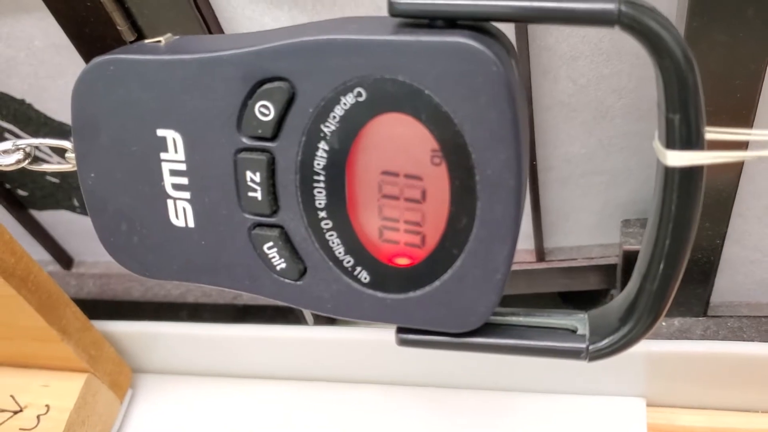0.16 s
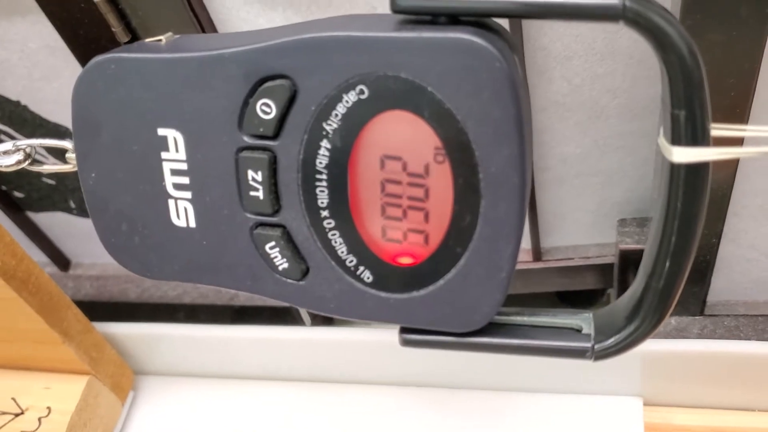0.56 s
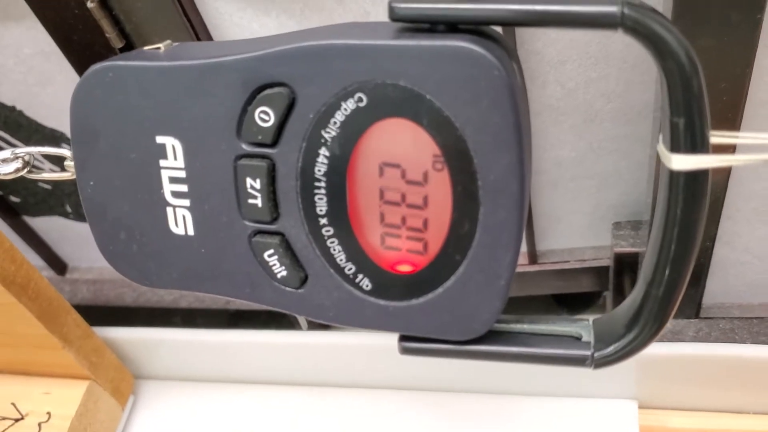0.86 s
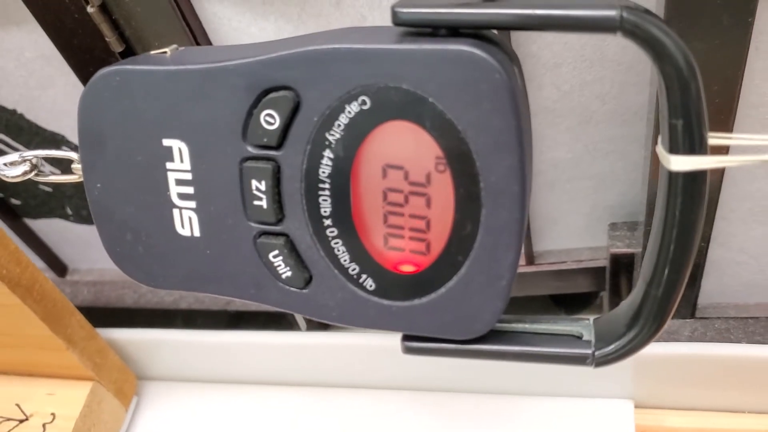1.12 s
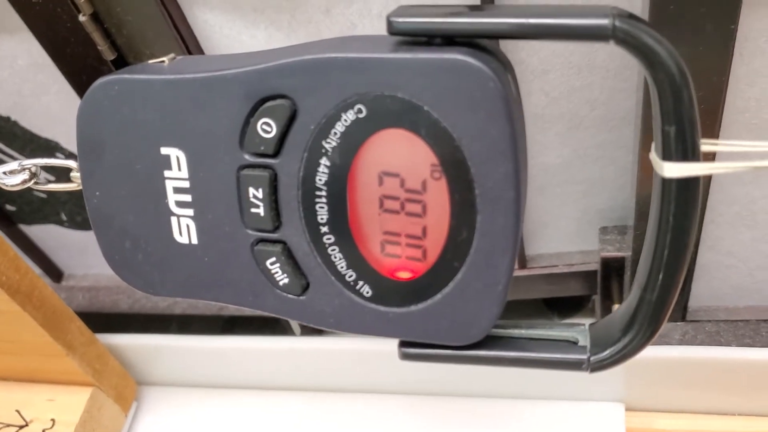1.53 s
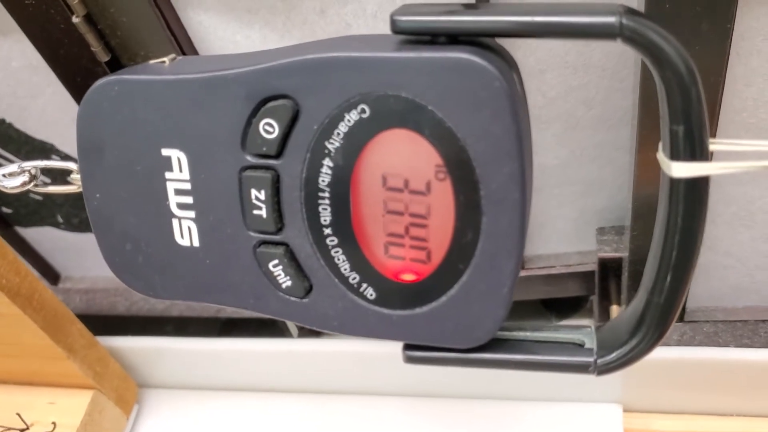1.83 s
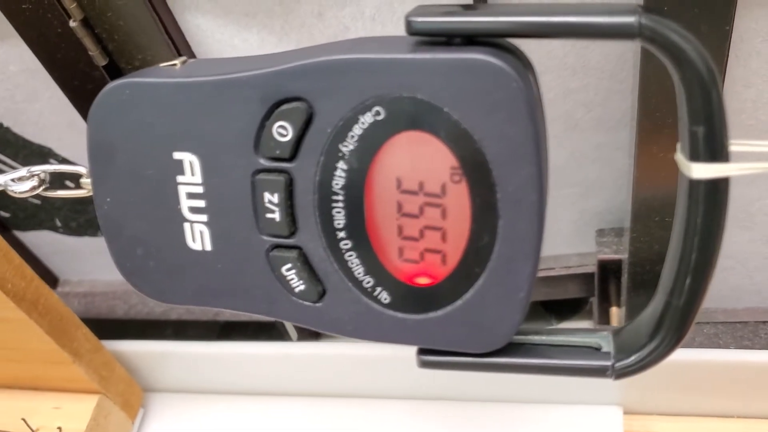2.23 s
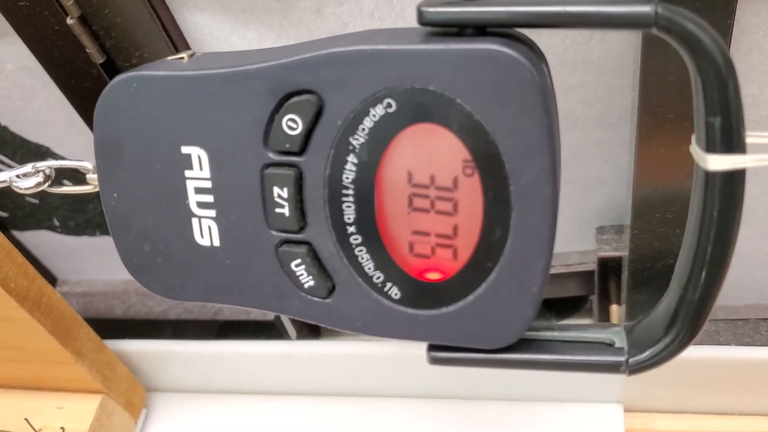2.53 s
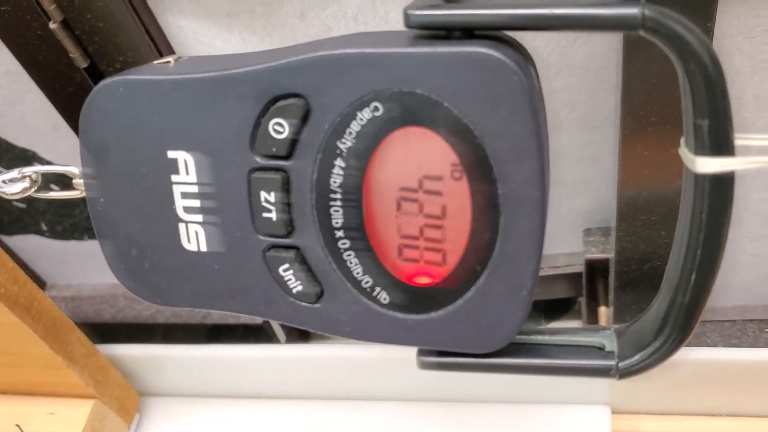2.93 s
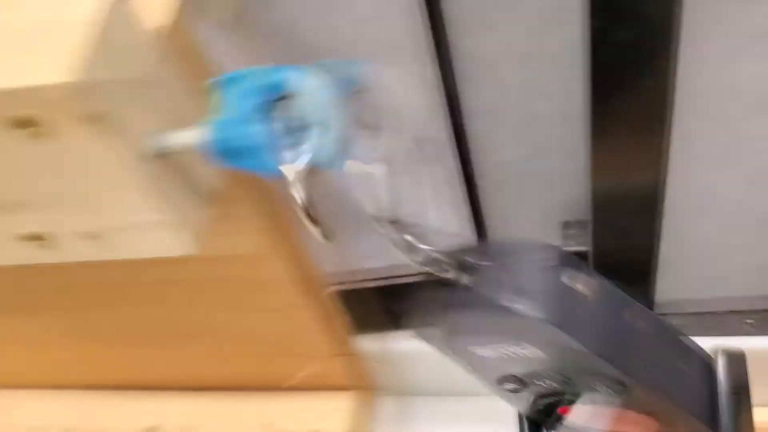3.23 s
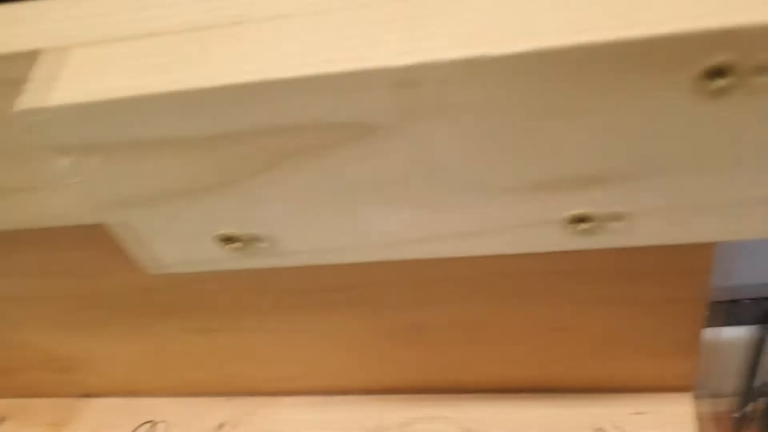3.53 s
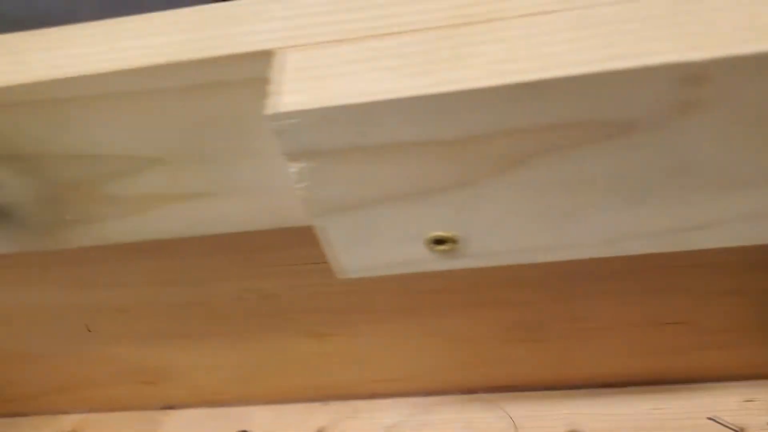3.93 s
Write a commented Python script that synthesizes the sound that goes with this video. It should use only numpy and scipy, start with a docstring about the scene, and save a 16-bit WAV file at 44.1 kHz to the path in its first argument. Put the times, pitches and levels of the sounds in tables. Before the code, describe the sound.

A low steady indoor hum, a faint tick or two, then a piercing snap, hissing whip and a clattering burst of wooden knocks.

```python
"""In a small workshop a braided line, loaded through a hanging scale, slips, ticks and snaps.
Splintery grit makes the cracks and fluttering noise the hiss of the line whipping through its guides.
Scale, chain and rig bang on a wooden bench of parallel resonances, then rattle to rest.
Wavering sines hum as a machine in the building and coloured noise rumbles as air;
this background sinks once the loud blows begin. A diffuse tail of decaying noise makes the room."""
import sys
import numpy as np
from scipy import signal
from scipy.fft import rfft, irfft
from scipy.io import wavfile

SR = 44100
rng = np.random.default_rng(int(sys.argv[2]) if len(sys.argv) > 2 else 0)


def to_wav(s):
    """Save 16-bit WAV."""
    ch = np.atleast_2d(s).T  # columns
    pcm = np.round(np.clip(ch, -1, 1) * 32767)  # PCM
    wavfile.write(sys.argv[1], SR, pcm.astype(np.int16))


def field_ratio(decibels):
    """Amplitude ratio for a level in dB (20 dB per decade); scalars and array-likes work."""
    return 10 ** (np.asarray(decibels, dtype=float) / 20)


N = 179433   # length in samples


def rms_one(x):
    """Power normalisation: scale to unit rms."""
    return x / np.sqrt(np.mean(x ** 2) + 1e-20)


def by_peak(x):
    """Peak normalisation: bring each channel to peak 1."""
    return x / np.abs(x).max(axis=1, keepdims=True)


def at_hz(points, hz):
    """Logarithmic frequency scale: interpolate a table between its points."""
    table_hz, values = np.array(points).T
    return np.interp(np.log(hz + 1), np.log(table_hz), values)


def coloured(x, spectrum):
    """Linear filtering: impose a spectrum; white noise of rms 1 keeps rms 1."""
    gain = field_ratio(at_hz(spectrum, np.fft.rfftfreq(N, 1 / SR)))
    return irfft(rfft(x) * rms_one(gain), N)


def stereo_noise(likeness):
    """Interchannel coherence: mid and side noise weighted for the likeness at each frequency."""
    mid, side = rfft(rng.standard_normal((2, N)))
    alike = np.clip(at_hz(likeness, np.fft.rfftfreq(N, 1 / SR)), -1, 1)
    common = np.sqrt(.5 + alike / 2) * mid
    opposed = np.sqrt(.5 - alike / 2) * side * [[1], [-1]]
    return irfft(common + opposed, N)


def drift(rate):
    """Random modulation: noise through a two-pole low-pass at rate/Hz, spread 1."""
    r = np.exp(-2 * np.pi * rate / SR)
    noise = rng.standard_normal(N + SR)
    return rms_one(signal.lfilter([1], [1, -2 * r, r * r], noise)[SR:])   # drop the settling second


def resonance(x, hz, width_hz):
    """Damped resonance: a two-pole band-pass with gain 1 at its top."""
    r = np.exp(-np.pi * width_hz / SR)
    zeros = np.array([1, 0, -1]) * (1 - r * r) / 2
    poles = [1, -2 * r * np.cos(2 * np.pi * hz / SR), r * r]
    return signal.lfilter(zeros, poles, x)


def swell(ms, size, sharp):
    """Impact envelope: peak 1 after ms; a sharper one also stops sooner."""
    t = np.arange(size) / SR / (ms / 1000)
    return (t * np.exp(1 - t)) ** sharp


def grit(size, spread_db, shared):
    """Impulsive noise: dense uneven micro-clicks, partly shared by both channels."""
    unevenness = field_ratio(spread_db * rng.standard_normal((3, size)))
    clicks = rng.standard_normal((3, size)) * unevenness
    return rms_one(clicks[:2] + shared * clicks[2])


def add(out, s, sound, pan_db):
    """Interaural cues: the far channel is softer and later."""
    lag_ms_per_db = .06
    for channel, side in enumerate((1, -1)):
        lag_s = max(-side * pan_db, 0) * lag_ms_per_db / 1000
        i = int((s + lag_s) * SR)
        out[channel, i:i + sound.shape[-1]] += (sound[channel] * field_ratio(side * pan_db / 2))[:N - i]


AIR_DB = -45.5   # air rms before the background's level course
# spectrum of the air: (f/Hz, relative density level/dB)
AIR_SPECTRUM = [(15, -29.5), (25, -21), (53, -1.5), (80, -1.5), (167, -14), (245, -24), (400, -26.5),
                (480, -23), (810, -31.5), (1380, -35), (1550, -43), (2100, -49.5), (4900, -57),
                (6000, -47.5), (9000, -46), (10500, -59.5), (14000, -56.5), (16000, -65)]
# left-right likeness of the background: (f/Hz, correlation/1)
COHERENCE = [(60, 0.96), (150, 1), (380, 0.76), (950, 0.35), (2380, 0.058), (5980, 0.004), (15000, -0.071)]
# machine tones before the level course: (f/Hz, rms level/dB, wavering rate/Hz)
MACHINE_TONES = [(59.2, -49, 14), (70.54, -48, 2.8), (154.1, -55, 4.5), (370.4, -74, 19), (452.8, -67, 3.9),
                 (524, -79, 4.8), (911, -76, 4.3), (1080, -84.5, 0.45), (1200, -72.5, 0.39),
                 (1317, -74.5, 0.15), (2345, -94.5, 1.3)]
# level course of the background: (t/s, level/dB, further level below 450 Hz/dB)
BACKGROUND_COURSE = [(0, 1.5, 0), (2.9, 2.06, -1), (3.2, -6, -4.5), (3.6, -12, 1.5), (4.07, -12.5, -3.5)]


def background():
    """Stationary noise and narrow-band tones: air, and a machine wavering in strength and phase."""
    t = np.arange(N) / SR
    out = field_ratio(AIR_DB) * coloured(stereo_noise(COHERENCE), AIR_SPECTRUM)
    for hz, level_db, rate in MACHINE_TONES:
        # a phase lag between the channels gives a tone the same likeness as the air
        lag = np.arccos(np.clip(at_hz(COHERENCE, hz), -1, 1)) / 2 * np.array([[1], [-1]])
        phase = 2 * np.pi * (hz * t + rng.random()) + .6 * drift(rate) + lag
        out += field_ratio(level_db + 2.5 * drift(rate)) * np.sqrt(2) * np.sin(phase)
    s, level_db, bass_db = np.transpose(BACKGROUND_COURSE)
    bass = signal.sosfilt(signal.butter(2, 450, fs=SR, output="sos"), out)
    out = out + (field_ratio(np.interp(t, s, bass_db)) - 1) * bass
    return out * field_ratio(np.interp(t, s, level_db)) * field_ratio([[-.6], [.6]])


ROOM_DB = -13.5   # share of all near sounds but the cracks
CLUTTER_DB = 3.0   # benches and shelves make the echoes arrive in clumps
# reverberation times: (f/Hz, time to fall by 60 dB/s)
REVERBERATION = [(200, 0.88), (800, 0.28), (3000, 0.28), (8000, 0.4), (15000, 0.23)]


def workshop(x):
    """Diffuse reverberation: octave bands of noise die each at its own rate, unlike in each channel."""
    t, tail = np.arange(SR // 2) / SR, 0
    for low in 125 * 2.0 ** np.arange(7):
        octave = signal.butter(2, [low, 2 * low], "band", fs=SR, output="sos")
        band = signal.sosfilt(octave, rng.standard_normal((2, len(t))))
        decay_db = -60 * t / at_hz(REVERBERATION, low * np.sqrt(2))
        tail = tail + band * field_ratio(CLUTTER_DB * drift(60)[:len(t)] + decay_db)
    tail = tail * np.clip(t / 0.025, 0, 1)   # the tail builds up over 25 ms
    tail = tail / np.sqrt(np.sum(tail ** 2) / 2)
    return signal.fftconvolve(x, tail, axes=1)[:, :N]


BENCH_Q = 22   # sharpest the wood rings
# resonances of the wooden bench: (f/Hz, least bandwidth/Hz, relative level/dB)
BENCH_MODES = [(224, 80, 2.5), (320, 100, -8), (371, 90, -8.5), (430, 75, -14), (521, 37, -4),
               (600, 60, -1.5), (625, 32, 0), (660, 35, 2), (746, 49, -2), (813, 90, -3.5), (890, 104, -2),
               (960, 100, -3.5), (1080, 48, 0), (1200, 93, -2.5), (1344, 58, 0), (1450, 160, -5),
               (1630, 290, -7.5), (1805, 300, -8.5), (2300, 500, -11)]


def bench(force, strengths):
    """Modal superposition: a band-limited force rings parallel resonances by signed strengths."""
    # a soft contact, and no body below the first mode
    contact = signal.butter(2, [200, 2400], "band", fs=SR, output="sos")
    force, ring = signal.sosfilt(contact, force), 0
    for (hz, width_hz, level_db), strength in zip(BENCH_MODES, strengths):
        ring = ring + strength * field_ratio(level_db) * resonance(force, hz, max(width_hz, hz / BENCH_Q))
    return ring


HOLLOW_HZ, HOLLOW_WIDTH_HZ = 673, 88   # the hollow under the bench top
LINKS_PER_S, LINKS_HZ, LINKS_DB = 300, 2780, -14   # chain links, level relative to the rattle
# shivering of the rig: (t/s, rattle level/dB, further level of the hollow ring/dB)
SHIVER_COURSE = [(2.891, -48, -11), (2.93, -36, -4.5), (3.0, -40.5, -9), (3.1, -45.5, -6),
                 (3.3, -46.5, -0.5), (3.38, -46.5, -3), (3.47, -43, 5), (3.6, -55.5, 0.5), (3.7, -60.5, -2),
                 (3.8, -63, -1), (3.85, -57, -3), (3.97, -70, 0), (4.021, -62.5, 2.5), (4.07, -71, 4)]


def shiver():
    """Frictional excitation: the dragging rig rattles the bench while chain links click at random."""
    force = grit(N, spread_db=5.0, shared=1.5) * field_ratio(2.5 * drift(30))
    octaves = np.log2(np.array(BENCH_MODES)[:, 0] / 900)
    signs = (-1) ** np.arange(len(BENCH_MODES))
    rattle = rms_one(bench(force, signs * field_ratio(-5 * np.abs(octaves))))
    hollow = resonance(force, HOLLOW_HZ, HOLLOW_WIDTH_HZ)
    hollow = rms_one(resonance(hollow, HOLLOW_HZ, 2 * HOLLOW_WIDTH_HZ))

    strengths = field_ratio(3 * np.minimum(rng.exponential(1, N), 3))
    touches = (rng.random(N) < LINKS_PER_S / SR) * strengths
    fading = signal.lfilter([1], [1, -np.exp(-1 / (0.0019 * SR))], touches)   # 1.9 ms decay
    scrapes = fading * grit(N, spread_db=0.5, shared=0.42)
    links = resonance(resonance(scrapes, LINKS_HZ, LINKS_HZ), LINKS_HZ, LINKS_HZ)
    links = field_ratio(LINKS_DB) * rms_one(links)

    t, (s, level_db, hollow_db) = np.arange(N) / SR, np.transpose(SHIVER_COURSE)
    mix = (rattle + links) * field_ratio([[1.6], [-1.6]]) + hollow * field_ratio(np.interp(t, s, hollow_db))
    return mix * field_ratio(np.interp(t, s, level_db, -120))


PUFF_T60_S = 0.05
# ticks of the rig, and bright tails ringing on after some cracks:
# (t/s, peak level before panning/dB, f/Hz, left-right level/dB, bandwidth as share of f/1)
TICKS_AND_TAILS = [(0.722, -41.5, 1200, 0.5, 0.39), (0.724, -57, 2000, 3.5, 0.33),
                   (0.733, -49, 1400, -3, 0.31), (.832, -55, 3400, 6.5, 0.19),
                   (1.077, -61.5, 2220, 3.5, 0.4), (1.258, -64, 2190, 9, 0.61), (0.937, -63, 1990, 2, 0.3),
                   (1.297, -53.5, 2400, 0, 0.48), (1.691, -56, 1510, -1, 0.17),
                   (2.345, -50.5, 8700, -2, 0.12), (2.594, -46.5, 3030, 6.5, 0.071),
                   (2.596, -57.5, 5500, 7, 0.13), (3.269, -39, 1840, 1, 0.76), (3.333, -33, 2210, -0.5, 1),
                   (3.352, -36, 1660, 5, 0.5), (3.358, -31, 3470, 0, 0.75), (3.53, -39, 4660, 4, 0.38),
                   (3.659, -45.5, 2560, 4, 0.33), (3.733, -56.5, 3500, 1, 0.7),
                   (3.553, -41, 2400, 0.5, 0.3), (4.023, -52.5, 3500, -0.5, 0.54),
                   (3.775, -50.5, 2230, 1, 0.99), (3.822, -32, 4380, 2, 1), (3.833, -45, 3000, 1.5, 0.12),
                   (3.846, -41, 4520, 1, 0.54), (3.856, -46, 4600, 1, 0.3), (3.883, -47, 4500, 2, 0.2),
                   (3.891, -48, 3540, 8, 1), (3.94, -61, 2000, 2, 0.37), (3.982, -60, 4500, 2, 0.3),
                   (4.04, -58, 4030, 0, 0.4), (3.682, -50.5, 1890, 5, 0.42),
                   (3.985, -51.5, 1800, 6.5, 0.88), (3.995, -51, 2390, 3.5, 0.72)]


def ticks_and_tails():
    """Resonant filtering of noise: each tick or tail is a dying puff in one resonance."""
    out, t = np.zeros((2, N)), np.arange(6000) / SR
    envelope = field_ratio(-60 * t / PUFF_T60_S) * np.clip(t / 0.00037, 0, 1)
    for s, peak_db, hz, pan_db, share in TICKS_AND_TAILS:
        burst = grit(6000, spread_db=5.0, shared=0.26) * envelope
        puff = resonance(resonance(burst, hz, share * hz), hz, share * hz)
        add(out, s, field_ratio(peak_db) * by_peak(puff), pan_db)
    return out


PUSH_S, THUMP_CYCLES = .006, 18.4   # onset time; cycles to die by 60 dB
# low thumps through the bench: (t/s, level before onset and decay/dB, f/Hz)
BENCH_THUMPS = [(2.884, -36, 100), (2.884, -30.5, 204), (2.972, -25.5, 158.5), (3.059, -30, 73.3),
                (3.105, -25.5, 168), (3.397, -29, 200), (3.414, -32.5, 88), (3.429, -31.5, 148),
                (3.512, -35, 187), (3.552, -36, 185), (3.617, -40.5, 183), (4.027, -40.5, 174)]


def thumps():
    """Damped free vibration: soft low pushes ring for a few cycles."""
    out, t = np.zeros((2, N)), np.arange(SR // 2) / SR
    onset = (1 - np.exp(-t / PUSH_S)) ** 2
    for s, level_db, hz in BENCH_THUMPS:
        decaying = field_ratio(level_db - 60 * t * hz / THUMP_CYCLES)
        thump = decaying * onset * np.sin(2 * np.pi * hz * t)
        add(out, s, thump * [[1], [1]], 0)
    return out


CONTACT_MS = 1.2   # time to the greatest force
FOCUS_DB_PER_OCTAVE = 8   # fall of the resonances away from a blow's pitch
BELOW_DB_PER_OCTAVE = 3.5   # further fall under that pitch
HARD_BLOW_DB, FOCUS_GAIN_PER_DB = -27, 2.6   # softer blows than this ring in fewer resonances
# blows on the wooden bench: (t/s, peak level before panning/dB, strongest f/Hz, left-right level/dB)
BENCH_BLOWS = [(2.89, -23, 1300, -6.5), (2.889, -25.5, 700, -2), (2.89, -31.5, 300, 2.5),
               (2.925, -32, 260, 2), (2.988, -29, 250, 1.5), (3.404, -28.5, 330, 0.5),
               (2.963, -21, 890, 3.5), (2.968, -20.5, 1300, 1), (2.974, -21, 905, 3.5),
               (2.981, -25, 650, 4.5), (2.994, -27.5, 674, 4), (3.012, -29, 640, 3.5), (3.03, -31, 800, 3),
               (3.045, -29, 796, 6), (3.056, -23.5, 1100, 4), (3.064, -28, 790, 3), (3.082, -26, 1140, 3),
               (3.093, -22.5, 1240, 6.5), (3.107, -30, 650, 7), (3.124, -33, 680, 4),
               (3.166, -39.5, 605, 4), (3.209, -35, 1080, 1), (3.228, -37, 1150, 5),
               (3.245, -35, 1070, 1.5), (3.25, -32.5, 660, 4), (3.269, -34, 676, 10),
               (3.299, -30.5, 1090, 4.5), (3.335, -29, 1300, 3.5), (3.345, -37.5, 690, -1),
               (3.358, -31, 1240, 3.5), (3.391, -30.5, 1040, 0.5), (3.405, -20.5, 1290, 6.5),
               (3.41, -22.5, 960, 0), (3.416, -24, 600, 5.5), (3.428, -19, 1250, 4.5),
               (3.429, -25.5, 700, 0), (3.4331, -17.5, 870, 0.5), (3.438, -22, 760, 1.5),
               (3.42, -30, 540, 0), (3.444, -24, 790, -1), (3.457, -33.5, 700, 8), (3.475, -33, 700, -1),
               (3.488, -23.5, 750, 4.5), (3.494, -27.5, 890, 1), (3.507, -28.5, 1200, 8),
               (3.515, -34.5, 1200, 4), (3.529, -43, 650, 7), (3.541, -38, 705, 0), (3.558, -38, 750, -1),
               (3.6, -47, 660, 2.5), (3.627, -49, 660, 2.5), (3.648, -46, 700, 1), (3.661, -44, 1450, 2),
               (3.684, -50, 680, -1), (3.698, -55, 720, 4), (3.78, -48, 1100, 3), (3.814, -42.5, 618, 0),
               (3.817, -34.5, 1080, 1), (3.835, -48, 670, 3), (3.872, -51.5, 615, 2), (3.89, -49, 660, 1),
               (3.938, -48.5, 665, 1), (4.012, -48, 690, -2), (4.026, -50.5, 1386, 7.5),
               (4.05, -58, 720, 0)]


def knocks():
    """Modal excitation: gritty blows drive the bench, strongest near each blow's own pitch."""
    out, pitches = np.zeros((2, N)), np.array(BENCH_MODES)[:, 0]
    for s, peak_db, hz, pan_db in BENCH_BLOWS:
        force = grit(8000, spread_db=8.0, shared=1.76) * swell(CONTACT_MS, size=8000, sharp=1.78)
        focus_db = FOCUS_DB_PER_OCTAVE + FOCUS_GAIN_PER_DB * max(HARD_BLOW_DB - peak_db, 0)
        octaves = np.log2(pitches / hz)
        fall_db = -focus_db * np.abs(octaves) + BELOW_DB_PER_OCTAVE * np.minimum(octaves, 0)
        signs = rng.choice([-1, 1], len(BENCH_MODES))   # each blow lands on another spot
        ring = bench(force, signs * field_ratio(fall_db))
        add(out, s - .002, field_ratio(peak_db) * by_peak(ring), pan_db)
    return out


WHIP_START_S, WHIP_RISE_S, WHIP_DB, WHIP_FALL_DB_PER_S = 2.895, 0.029, -22, 104
WHIP_LIFT_DB, WHIP_LIFT_S = 16, 0.12   # the treble leads and fades sooner
WHIP_FLUTTER_DB, WHIP_FLUTTER_HZ = 1.2, 140   # the lashing line hisses unevenly
# spectrum of the hiss before the treble lift: (f/Hz, relative density level/dB)
WHIP_SPECTRUM = [(880, -68), (1500, -6), (2740, 1), (4480, 3.5), (6820, -1.5), (14200, -1.5), (15900, -8),
                 (16500, -29)]


def whip():
    """Friction noise: the freed line's hiss through its guides swells, then dies."""
    since = np.maximum(np.arange(N) / SR - WHIP_START_S, 0)
    hiss = coloured(grit(N, spread_db=4.0, shared=.4), WHIP_SPECTRUM) * field_ratio([[1.0], [-1.0]])
    hiss = hiss * field_ratio(WHIP_FLUTTER_DB * drift(WHIP_FLUTTER_HZ))
    treble = signal.sosfilt(signal.butter(2, 8000, "high", fs=SR, output="sos"), hiss)
    hiss = hiss + (field_ratio(WHIP_LIFT_DB * np.exp(-since / WHIP_LIFT_S)) - 1) * treble
    rise = (1 - np.exp(-since / WHIP_RISE_S)) ** 2
    return hiss * rise * field_ratio(WHIP_DB - WHIP_FALL_DB_PER_S * since)


ROOM_PAN_SHARE = .4   # how much of a crack's side its feed to the room keeps
# spectrum of the cracks before the treble lift: (f/Hz, relative density level/dB)
CRACK_SPECTRUM = [(300, -34.5), (700, -21), (1500, -7.5), (3600, -1), (4460, -0.5), (6100, -4.5),
                  (11000, -1.5), (13400, -6), (15200, 0.5), (17000, -11)]
# sharp cracks: a slip of the loaded line, the snap, then chain and scale striking:
# (t/s, peak level before colouring and panning/dB, left-right level/dB, treble lift/dB,
#  room share/dB, rise/ms)
SHARP_CRACKS = [(0.831, -44.5, 10, -5, 1, 1.0), (1.299, -59, 0.5, -20, 2, 0.57),
                (2.8884, -3.5, 6, 7, -5, 1.6), (3.091, -23.5, 2, -20, -4.5, 3),
                (3.117, -29, 8, 10, -13, 1.74), (3.124, -24.5, 6, 12, -10, 1.4),
                (3.1585, -23, 1, 1, -15, 1.6), (3.1712, -26.5, 8, -11, -24, 2.3),
                (3.2059, -11, 2, -6, -12.5, 1.5), (3.219, -19, -1, 1, -18, 0.88),
                (3.2343, -15.5, 0.5, 6, -17, 2), (3.287, -7.5, -0.5, 4.5, -10, 1.33),
                (3.399, -28, 5, -1, -15, 1), (3.4042, -14.5, 3, -7, -15, 1.4),
                (3.408, -13.5, 4.5, -4.5, -5, 1.7), (3.426, -25, 3, -3, -13, 2.5),
                (3.4391, -18, 4, -1, -9, 1.3), (3.442, -20.5, 3, -5.5, -15, 3),
                (3.463, -24.5, 4, 6, -22, 1.4), (3.485, -20, -1.5, 8.5, -24, 1.4),
                (3.5018, -23.5, 0, 3, -10, 1.6), (3.5217, -21.5, -5, 8, -19, 1.6),
                (3.5536, -17, -2, 5.5, -17, 2.3), (3.559, -19, -3.5, 2.5, -13.5, 1.8),
                (3.678, -38.5, 2.5, -8, -18.5, 1.7), (3.772, -56, 0, -8, -11.5, 1.4),
                (3.8136, -9.5, -4, 11, -14.5, 1.74), (4.0226, -51, 0.5, -8, -3.5, 1.2)]


def cracks():
    """Impulsive radiation: ms-long splintery grit, and clicks of matching energy for the room."""
    out, feed = np.zeros((2, 2, N))
    high = signal.butter(1, 6000, "high", fs=SR, output="sos")
    for s, peak_db, pan_db, lift_db, room_db, rise_ms in SHARP_CRACKS:
        burst = grit(4000, spread_db=4.5, shared=0.45) * swell(rise_ms, size=4000, sharp=0.87)
        click = np.tile(signal.unit_impulse(4000), (2, 1))
        lift = field_ratio(lift_db) - 1
        burst = burst + lift * signal.sosfilt(high, burst)
        click = click + lift * signal.sosfilt(high, click)
        burst = field_ratio(peak_db) * by_peak(burst)
        click = np.sqrt(np.mean(burst ** 2)) * rms_one(click)
        add(out, s - .0005, burst, pan_db)
        add(feed, s, field_ratio(room_db) * click, ROOM_PAN_SHARE * pan_db)
    return coloured(out, CRACK_SPECTRUM), coloured(feed, CRACK_SPECTRUM)


def scene():
    """Superposition: direct blows, their reverberation and the background add."""
    crack, crack_feed = cracks()
    near = knocks() + ticks_and_tails() + whip() + shiver()
    room = workshop(crack_feed + field_ratio(ROOM_DB) * near)
    return crack + near + room + thumps() + background()


def roll_off(x):
    """The treble ends steeply here."""
    return signal.sosfilt(signal.butter(12, 17000, fs=SR, output="sos"), x)


CEILING, TOP_HZ = .5, 16000   # limit of the rounded peaks (full scale 1); start of the stop band


def record(dry):
    """Soft saturation and band limiting: peaks are rounded, then the top is cut steeply."""
    rounded = CEILING * np.tanh(dry / CEILING)
    cut = signal.sosfilt(signal.cheby2(12, 22, TOP_HZ, fs=SR, output="sos"), rounded)
    return roll_off(cut)


dry = scene()
out = record(dry)
to_wav(out)
```